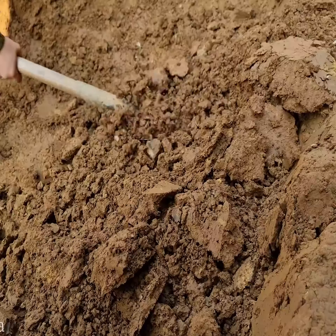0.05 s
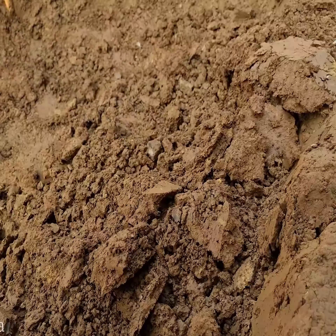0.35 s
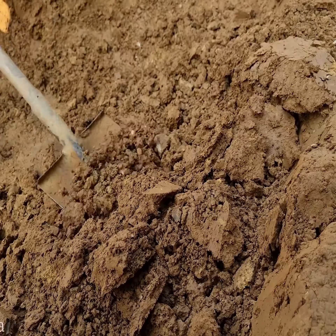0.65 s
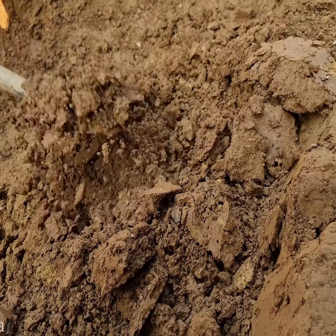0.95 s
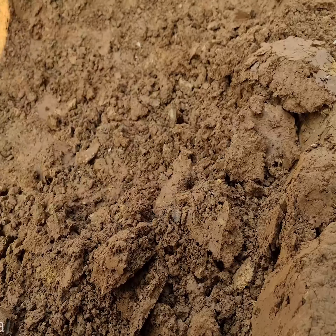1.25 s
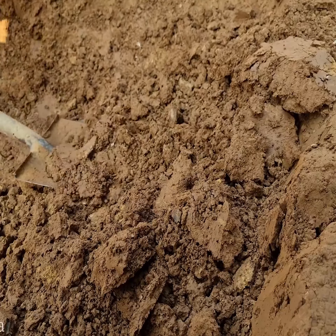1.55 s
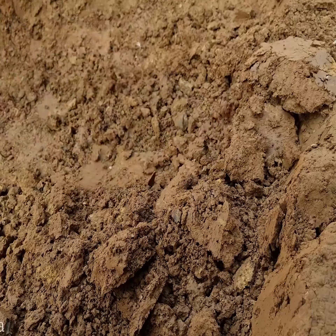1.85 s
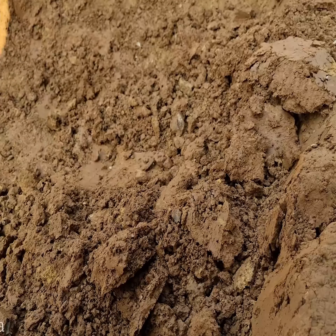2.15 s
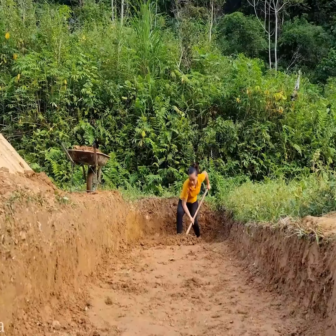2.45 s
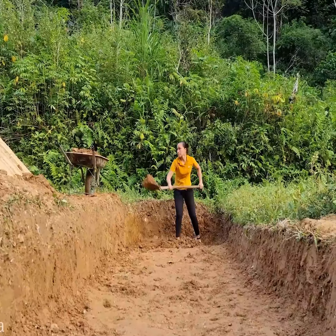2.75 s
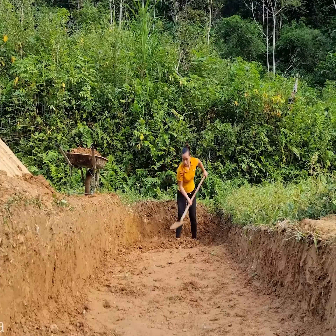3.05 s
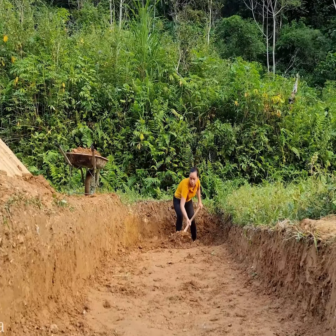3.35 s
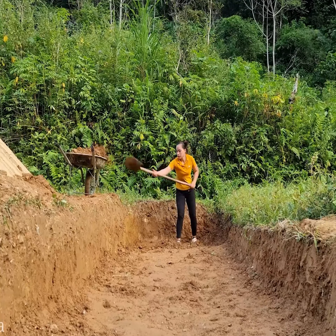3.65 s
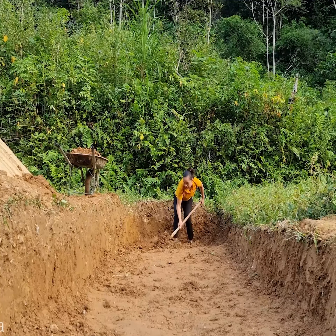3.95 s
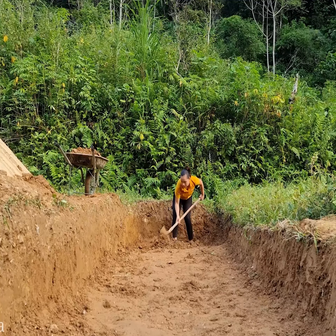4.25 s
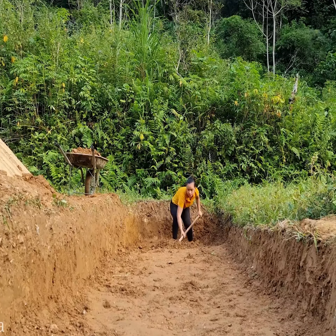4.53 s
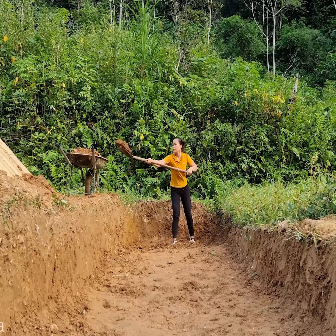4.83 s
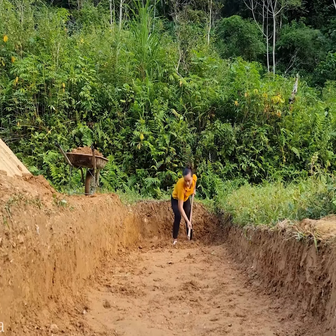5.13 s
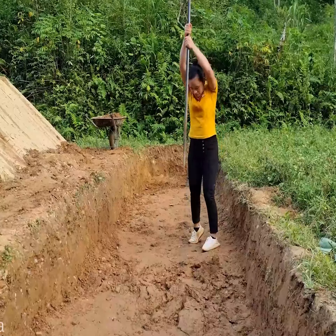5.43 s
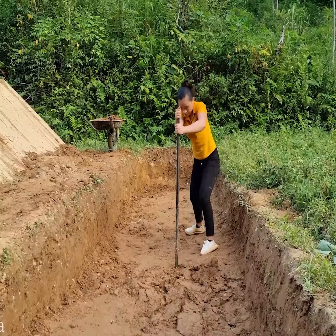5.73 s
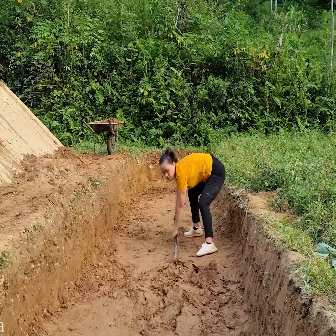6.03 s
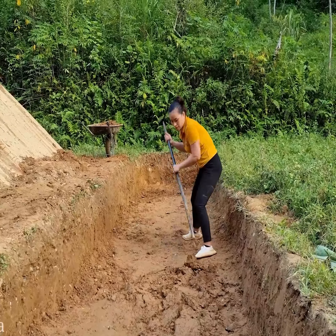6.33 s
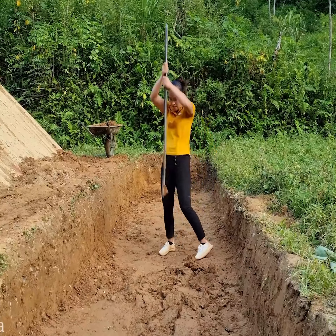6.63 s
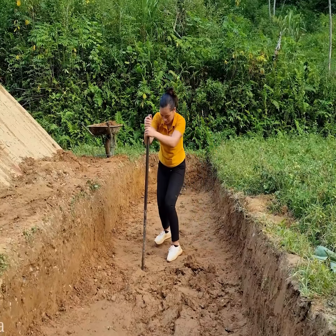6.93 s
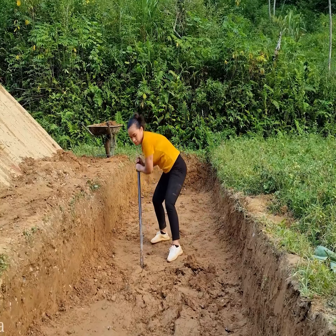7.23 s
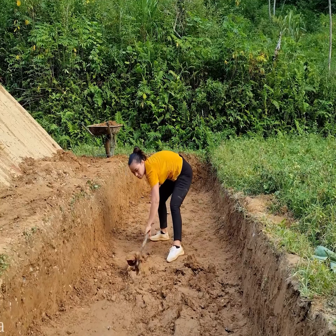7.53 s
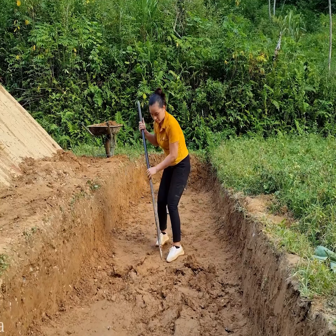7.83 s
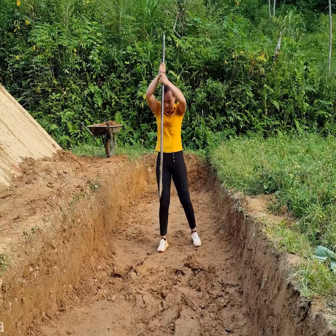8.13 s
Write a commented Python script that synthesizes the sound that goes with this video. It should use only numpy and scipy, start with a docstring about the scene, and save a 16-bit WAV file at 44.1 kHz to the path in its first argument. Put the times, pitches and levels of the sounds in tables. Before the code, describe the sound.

Irregular crunching strikes in dry soil outdoors, close at first over a faint hum, then softer scoops and dull blows of a bar.

```python
"""Outdoors, on dry clay. Close by, a hoe chops and drags through clods while a distant engine gathers speed
and an insect sings. Then a shovel scoops farther off, its blade ringing faintly, and last an iron bar is
rammed into the ground, with a stream murmuring behind and thin chirps from the bushes. Breaking soil is a
swarm of tiny impulses that excite each tool's modes; blows on stone and earth are damped oscillations."""
import sys
import numpy as np
from scipy import signal
from scipy.fft import rfft, irfft, next_fast_len
from scipy.io import wavfile
from scipy.ndimage import uniform_filter1d

SR = 44100
rng = np.random.default_rng(int(sys.argv[2]) if len(sys.argv) > 2 else 0)


def to_wav(s):
    """Save 16-bit WAV."""
    ch = np.atleast_2d(s).T  # columns
    pcm = np.round(np.clip(ch, -1, 1) * 32767)  # PCM
    wavfile.write(sys.argv[1], SR, pcm.astype(np.int16))


N = 360738
TIME = np.arange(N) / SR


def from_db(db):
    """Amplitude ratio of a level: tenfold for every 20 dB."""
    return 10 ** (np.asarray(db) / 20)


def rms_one(x):
    """Normalisation to unit mean power."""
    return x / np.sqrt(np.mean(x ** 2) + 1e-20)


def band(x, low_hz, high_hz, order=2):
    """Causal Butterworth band-pass filtering."""
    edges = [low_hz, min(high_hz, SR / 2 - 500)]
    return signal.sosfilt(signal.butter(order, edges, "band", fs=SR, output="sos"), x + 1e-18)


def resonate(x, hz, width_hz):
    """Forced response of a damped oscillator, with unit gain at resonance."""
    r = np.exp(-np.pi * width_hz / SR)
    feedback = [1, -2 * r * np.cos(2 * np.pi * hz / SR), r * r]
    return signal.lfilter(np.array([1, 0, -1]) * (1 - r * r) / 2, feedback, x + 1e-18)


def drift(per_s):
    """Random modulation of unit rms, interpolated between independent values."""
    points = rng.standard_normal(4000)
    return rms_one(np.interp(TIME * per_s, np.arange(len(points)), points))


def colour(x, points):
    """Spectral shaping by a curve of (frequency [Hz], gain [dB])."""
    size = next_fast_len(N)
    hz, db = np.transpose(points)
    gain_db = np.interp(np.log(np.fft.rfftfreq(size, 1 / SR) + 1), np.log(hz), db)
    return irfft(rfft(x, size) * from_db(gain_db), size)[..., :N]


def air(spectrum):
    """Diffuse outdoor noise: the channels are most coherent in the low hundreds of hertz, wide above."""
    # stereo width: (frequency [Hz], side over mid [dB])
    side_gain = [(60, 0), (200, -9), (400, -8.5), (700, -7), (1290, -0.5), (2400, 5.5), (4400, 4),
                 (8000, -0.5), (15000, 3)]
    mid, side = rng.standard_normal((2, N))
    return rms_one(colour(mid + colour(side, side_gain) * [[1], [-1]], spectrum))


def engine(db=-57, fade_db_per_s=2, waver_db=1.5, firing_db=2.5):
    """A receding engine's orders rise with shaft speed and waver; uneven firing modulates their sum."""
    # acceleration: (time [s], shaft speed [turns/s])
    speed = [(0, 85), (0.45, 87.6), (1.0, 95), (1.6, 101), (2.1, 106), (2.4, 108)]
    # partials: (multiple of shaft speed, relative level [dB])
    orders = [(1.001, -11), (2.001, -3), (3.002, -13.5), (3.5, -8.5), (4, -6), (4.2, -6.5), (4.5, -2.5),
              (5, -3), (6, -12.5)]
    angle = 2 * np.pi * np.cumsum(np.interp(TIME, *np.transpose(speed))) / SR
    hum = np.zeros(N)
    for multiple, level in orders:
        strength = from_db(level + waver_db * drift(11))
        hum += strength * np.sin(multiple * angle + rng.uniform(0, 2 * np.pi) + .5 * drift(14))
    return from_db(db - fade_db_per_s * TIME + firing_db * drift(60)) * band(hum, 110, 3000, order=6)


def insect():
    """A shrill note and two overtones share a slight random frequency modulation."""
    # partials: (frequency [Hz], rms level [dB])
    partials = [(4694, -79), (9388, -86), (14080, -81)]
    flutter = 1 + .003 * drift(150)
    phase_per_hz = 2 * np.pi * np.cumsum(flutter) / SR
    return sum(from_db(db) * np.sqrt(2) * np.sin(hz * phase_per_hz) for hz, db in partials)


def crumbs(per_s=9.0, db=-64.5, settle_s=.003):
    """Stray crumbs roll off the heap as a Poisson process, each a decaying burst of noise."""
    falls = rng.uniform(1, 2, N) * (rng.random(N) < per_s / SR)
    tumble = signal.lfilter([1], [1, -np.exp(-1 / (settle_s * SR))], falls + 1e-18)
    return from_db(db) * tumble * rms_one(band(rng.standard_normal(N), 2500, 11000))


def blows(table, ring_cycles, rough):
    """Damped oscillations rise in half a cycle, fall 60 dB in ring_cycles; crushed grains add noise."""
    out, t = np.zeros(N), TIME[:SR // 8]
    for s, db, hz in table:
        crush = rms_one(band(rng.standard_normal(len(t)), hz / 2, hz * 2))
        envelope = np.minimum(2 * t * hz, 1) * from_db(db - 60 * t * hz / ring_cycles)
        blow = envelope * (np.sin(2 * np.pi * hz * t) + rough * crush)
        start = int(s * SR)
        out[start:start + len(t)] += blow[:N - start]
    return out


def earth():
    """Damping sets the timbre: packed earth thuds for a few cycles, hollow plops ring longer."""
    # dull blows and faint plops: (time [s], relative level [dB], pitch [Hz])
    thuds = [(0.061, -35.5, 340), (0.703, -39, 260), (1.5, -46, 217), (2.151, -41, 260), (2.36, -34.5, 300),
             (5.494, -44.5, 750), (5.612, -36.5, 320), (5.6265, -30, 270), (6.53, -58, 280),
             (6.9128, -30.5, 242), (7.953, -51.5, 239)]
    plops = [(3.78, -53.5, 570), (4.94, -57.5, 423), (6.155, -58, 468), (6.262, -53, 543),
             (7.1, -57.5, 500)]
    dull = blows(thuds, ring_cycles=6.1, rough=0.35) + blows(plops, ring_cycles=34, rough=0.18)
    return from_db(2.5) * band(dull, 175, 3000, order=3)


def stones():
    """Hard impact: the blade meets a stone or a hard clod with a brief, high ring."""
    # knocks: (time [s], relative level [dB], pitch [Hz])
    knocks = [(0.0612, -27, 1140), (0.1278, -11, 2860), (0.7195, -1, 2000), (0.7217, -4, 1576),
              (1.7135, -6, 3280), (1.748, -26, 1240), (2.2995, -30.5, 1160), (2.3653, -8, 3150),
              (2.588, -31, 2230), (5.1031, -19.5, 1990), (5.1045, -24.5, 1270), (5.2095, -26.5, 1300)]
    return from_db(-2) * band(blows(knocks, ring_cycles=16, rough=0.64), 490, 12000)


def grit(per_s, spread_db, dust):
    """Shot noise: grains of uneven size snap at random over a hiss of fine dust."""
    sizes = from_db(spread_db * np.minimum(rng.exponential(1, N), 3)) * rng.choice([-1, 1], N)
    return rms_one(sizes * (rng.random(N) < per_s / SR)) + dust * rng.standard_normal(N)


def steady(x, window_s):
    """Division by the running rms evens out the strength but keeps the single grains."""
    return x / np.sqrt(np.abs(uniform_filter1d(x ** 2, int(window_s * SR))) + 1e-9)


def burst(t, rise_s, hold_s, fall_s):
    """Transient envelope: a linear rise, then exponential decay from hold_s on."""
    return np.minimum(t / rise_s, 1) * np.exp(-np.maximum(t - hold_s, 0) / fall_s)


def add(power, s, envelope, db, bass_db, treble_db):
    """Incoherent sounds add in power: one burst joins the bass, body and treble at time s."""
    start = int(s * SR)
    gains = from_db([[db + bass_db], [db], [db + treble_db]])
    power[:, start:start + len(envelope)] += ((gains * envelope) ** 2)[:, :N - start]


def breaking(entry_s=0.006, slide_db=-11, jam_build_s=0.004, trickle_db=-27.5):
    """Envelopes of fracturing soil in three bands: chops enter, slide and jam; clods and scuffs burst."""
    # a tool cuts in: (time [s], entry level [dB], travel [s], jam level [dB], settling [s],
    # bass offset [dB], treble offset [dB])
    chops = [(0.094, -42, 0.037, -29.5, 0.012, -17, 1), (0.6995, -16.5, 0.023, -18.5, 0.0039, -8.5, 0.5),
             (1.4969, -35.5, 0.017, -34, 0.0023, 2, 4.5), (1.712, -23.5, 0.035, -34, 0.0024, -21.5, 2),
             (2.3429, -23.5, 0.022, -19, 0.004, -10, -0.5), (2.482, -37.5, 0.012, -46, 0.045, -4, -4),
             (3.2297, -32.5, 0.012, -32, 0.011, -14.5, -1), (3.9281, -36, 0.012, -35, 0.019, -20, -1.5),
             (4.224, -42.5, 0.02, -34, 0.012, -11.5, -4.5), (4.5447, -31.5, 0.022, -30.5, 0.0093, -10, -3),
             (5.207, -35.5, 0.021, -46, 0.007, 0, -4.5), (5.6087, -36, 0.0055, -50, 0.0032, 0.5, -3.5),
             (6.892, -50, 0.016, -60.5, 0.0039, 2, 3.5)]
    # a clod drops and bursts: (time [s], level [dB], bass offset [dB], treble offset [dB])
    clods = [(0.557, -44, 11.5, -1), (0.9677, -39, -8, -3.5), (1.391, -50.5, -5, 8.5),
             (1.49, -48.5, -15, 10), (2.08, -58, 4, 7.5), (2.149, -54.5, -2, 5), (2.586, -46.5, -1, -1.5),
             (2.615, -50, -3, -11.5), (2.819, -56, -23, 2), (3.07, -57, -0.5, 4), (3.3369, -38.5, -35, -3),
             (3.709, -54.5, -8, 1.5), (3.766, -59, 8.5, 11), (4.604, -51, -25, -6)]
    # light scuffs on loose ground: (time [s], level [dB])
    scuffs = [(2.959, -65.5), (3.348, -66.5), (3.674, -71), (4.095, -65), (5.914, -62), (7.214, -68.5)]
    power, t = np.zeros((3, N)), TIME[:SR // 5]
    for s, entry_db, travel_s, jam_db, settle_s, bass_db, treble_db in chops:
        entry = burst(t, rise_s=0.0032, hold_s=entry_s, fall_s=0.0045)
        add(power, s, entry, entry_db, bass_db, treble_db + 1.5)   # dry crust sounds bright
        # the quiet slide builds to the jam just before the blade stops
        packing = from_db(slide_db * (1 - np.exp(np.minimum(t - travel_s, 0) / jam_build_s)))
        jam = packing * burst(t, entry_s, travel_s, settle_s)
        trickle = from_db(trickle_db) * burst(t, travel_s, travel_s, fall_s=0.0084)   # crumbs run on
        add(power, s, jam + trickle, jam_db, bass_db, treble_db - 4)   # packed clay sounds dull
    for s, db, bass_db, treble_db in clods:
        add(power, s, burst(t, rise_s=0.0029, hold_s=0.00524, fall_s=0.0032), db, bass_db, treble_db)
    for s, db in scuffs:
        add(power, s, burst(t, rise_s=0.003, hold_s=0.026, fall_s=0.015), db, bass_db=-2, treble_db=9)
    return np.sqrt(power)


def bites(clump_db=3.5, clumps_per_s=300):
    """Brittle fracture gives dense bursts of impulses: coarse lumps sound low, sand high."""
    lumps = band(grit(per_s=1200, spread_db=7.0, dust=.14), 370, 1600)
    grains = band(grit(per_s=2700, spread_db=0.5, dust=.3), 1200, 4530, order=3)
    sand = band(grit(per_s=5300, spread_db=4.5, dust=.3), 4700, 14000, order=3)
    bass = from_db(-2.5) * steady(lumps, 0.021)
    body = from_db(-4) * steady(grains, 0.021)
    treble = from_db(1.9) * steady(band(sand, 4200, 12000, order=1), 0.012)
    treble = band(treble, 2000, 12000, order=1)
    cracks = steady(from_db(clump_db * drift(clumps_per_s)), 0.036)   # soil gives way unevenly
    return np.sum(breaking() * [bass, body, treble], axis=0) * cracks


def steel(x, modes, direct_db, ring_db):
    """Modal superposition: the excitation is heard directly and through the tool's resonances."""
    ring = sum(from_db(db) * resonate(x, hz, width) for hz, width, db in modes)
    return from_db(direct_db) * x + from_db(ring_db) * ring


def hoe(crunch, hits):
    """Forced vibration: the crunch drives the hoe's blade, while the hits are heard directly."""
    # blade modes: (frequency [Hz], bandwidth [Hz], relative gain [dB])
    hoe_modes = [(1384, 70, -5), (2000, 140, 0.5), (2250, 120, 4), (3350, 200, 10), (4400, 270, 7.5),
                 (5432, 37, 0.5), (5940, 110, -4.5), (8060, 100, -3), (8950, 80, -8)]
    return steel(crunch, hoe_modes, direct_db=-2.5, ring_db=-11) + hits


def drags(treble_db=1.0, clump_db=1.5):
    """Granular friction: loose crumbs rasp along the pulled blade in uneven clumps."""
    # one curve for each pull: (time [s], level [dB], treble offset [dB])
    strokes = [
        [(0.74, -48, -2.5), (0.774, -52, -6), (0.784, -47, -3.5), (0.844, -56.5, 4), (0.888, -41.5, -3),
         (0.928, -46.5, -6), (0.945, -65, -8)],
        [(1.52, -56, 5.5), (1.578, -65, 7), (1.64, -46.5, 5), (1.686, -51.5, 7.5), (1.706, -35.5, 0),
         (1.711, -33, 15)],
        [(2.382, -48, -0.5), (2.445, -67.5, 0)],
        [(3.268, -47, 8), (3.282, -47, -4), (3.298, -52.5, 11.5), (3.31, -54, -3.5), (3.335, -72, 17)],
    ]
    body = rms_one(band(grit(per_s=2000, spread_db=5.5, dust=1.0), 1300, 3800, order=3))
    treble = rms_one(band(grit(per_s=4000, spread_db=2.0, dust=.4), 3640, 10950))
    out = np.zeros(N)
    for stroke in strokes:
        s, db, bright_db = np.transpose(stroke)
        pull = from_db(np.interp(TIME, s, db, left=-200, right=-200))
        brightness = from_db(treble_db + np.interp(TIME, s, bright_db))
        out += pull * (body + brightness * treble)
    return out * from_db(clump_db * drift(130))


def shovel(crunch, hits):
    """Crunch and hits both excite the shovel's resonances; distance dulls the top."""
    # blade modes: (frequency [Hz], bandwidth [Hz], relative gain [dB])
    shovel_modes = [(922, 64, 8.3), (1656, 20, 3.2), (1750, 420, 2.1), (1828, 36, 2.7), (2220, 220, 1.1),
                    (2830, 100, 0.66), (3908, 99, 11.5), (4200, 270, 4.6), (5480, 170, 7.8),
                    (5850, 69, 2.2), (7340, 390, 1.2)]
    scoops = steel(crunch, shovel_modes, direct_db=-5, ring_db=-2.8)
    clanks = steel(hits, shovel_modes, direct_db=-3, ring_db=-8)
    return band(scoops + clanks, 150, 11700, order=1)


def stream(bubbles_per_s=260, sizes=14):
    """Bubble resonance: small bubbles ring briefly at random over the broad rush of the water."""
    # rushing water: (frequency [Hz], relative spectral density [dB])
    water = [(30, -29), (110, -30), (180, -15), (270, -15), (420, -9.5), (700, -10.5), (950, -2),
             (1280, -12), (1600, -7.5), (2750, -13.5), (3400, -13), (10500, -22.5), (16000, -27.5)]
    rush = from_db(-61) * air(water)
    pops = from_db(4 * np.minimum(rng.exponential(1, N), 3)) * (rng.random(N) < bubbles_per_s / SR)
    size_of_pop = rng.integers(0, sizes, N)
    pitches = np.geomspace(700, 1300, sizes)
    babble = sum(resonate(pops * (size_of_pop == k), hz, hz / 7) / hz for k, hz in enumerate(pitches))
    return rush + from_db(-69.5) * rms_one(babble)


def bar(crunch, hits):
    """The crunch rings the iron bar, chiefly in two lightly damped modes; the hits are heard directly."""
    # bar modes: (frequency [Hz], bandwidth [Hz], relative gain [dB])
    bar_modes = [(1900, 1000, 14), (3400, 50, 34), (6100, 180, -18), (7500, 73, 30), (9230, 210, 14)]
    return steel(crunch, bar_modes, direct_db=-4, ring_db=-21) + hits


def chirps():
    """Narrow-band noise has a restless pitch: thin calls from the bushes swell and fade."""
    # calls: (time [s], duration [s], pitch [Hz], resonator bandwidth [Hz], level [dB])
    calls = [(5.632, .14, 9050, 400, -71.5), (5.64, 0.13, 12800, 800, -73), (7.092, 0.17, 3450, 600, -67.5),
             (7.586, 0.17, 9150, 400, -64.5), (7.62, .22, 12300, 1300, -71.5)]
    out = np.zeros((2, N))
    for s, length, hz, width, db in calls:
        noise = rng.standard_normal((2, N))
        whistle = rms_one(resonate(resonate(noise, hz, width), hz, width))
        out += from_db(db) * whistle * np.sin(np.pi * np.clip((TIME - s) / length, 0, 1))
    return out


def trench(x, echo_db, t60_s=0.037):
    """Diffuse reflection: rough earth walls return a short, dull echo, different on each side."""
    t = TIME[:SR // 3]
    envelope = from_db(-60 * t / t60_s) * np.minimum(t / .008, 1)
    scatter = band(rng.standard_normal((2, len(t))), 500, 5000, order=1) * envelope
    scatter /= np.sqrt(np.sum(scatter ** 2) / 2)
    return from_db(echo_db) * signal.fftconvolve(x[None], scatter, axes=1)[:, :N]


def microphones(x, phase, left_db):
    """Directional cues: sound reaches the two microphones with different phase and strength."""
    size = next_fast_len(N)
    lead = np.interp(np.fft.rfftfreq(size, 1 / SR), *np.transpose(phase))
    sides = np.array([[.5], [-.5]])
    return irfft(rfft(x, size) * np.exp(1j * lead * sides), size)[:, :N] * from_db(left_db * sides)


def scene():
    """Superposition: hoe, shovel and bar work in turn, each before its own crossfaded background."""
    # arrival from near and far work: (frequency [Hz], phase lead of left over right [rad])
    near_phase = [(0, 0.5), (3100, 1.0), (4130, 1.5), (5510, 2), (6370, 7), (7840, 10.5), (13200, 10.5),
                  (16300, 12.5)]
    far_phase = [(0, 0), (2760, 1.7), (3300, -0.9), (4310, 1.8), (4820, -1.8), (5600, -1.2), (6370, 2),
                 (8500, 1.74), (9400, -1.7), (16000, 0.3)]
    # outdoor hush behind hoe and shovel: (frequency [Hz], relative spectral density [dB])
    hoe_air = [(30, -40.5), (90, -28.5), (134, -21.5), (180, -8.5), (280, -14), (400, -12.5), (900, -13.5),
               (1400, -21.5), (2010, -25.5), (4400, -31), (7000, -35), (11000, -35.5), (14000, -45.5),
               (16000, -54)]
    shovel_air = [(18, -59), (30, -13), (121, -24.5), (189, -4.5), (266, -8), (486, -5), (684, -10),
                  (913, -1), (1960, -6), (2900, -8), (3310, -10), (7870, -16.5), (16000, -25)]
    hoe_end_s, shovel_end_s = 2.43, 5.3
    hoe_on, bar_on = 1.0 * (TIME < hoe_end_s), 1.0 * (TIME > shovel_end_s)
    shovel_on = 1 - hoe_on - bar_on
    crunch = bites() + drags() + crumbs() * (1 - bar_on)
    hits = stones() + earth()
    near = hoe(crunch * hoe_on, hits * hoe_on)
    far = shovel(crunch * shovel_on, hits * shovel_on) + bar(crunch * bar_on, hits * bar_on)
    digging = microphones(near, near_phase, left_db=2.5) + trench(near, echo_db=-17.5)
    digging += microphones(far, far_phase, left_db=-0.5) + trench(far, echo_db=-17)
    fade_out, fade_in = np.clip((2.47 - TIME) / .07, 0, 1), np.clip((TIME - 5.2) / .05, 0, 1)
    behind = fade_out * (from_db(-58) * air(hoe_air) + insect() + engine())
    behind += np.sqrt(fade_in) * stream()
    behind += np.sqrt(1 - fade_out - fade_in) * from_db(-62) * air(shovel_air)
    return digging + behind + chirps()


def record(dry):
    """Band limiting: an elliptic low-pass cuts steeply above 16.2 kHz."""
    return signal.sosfilt(signal.ellip(10, .1, 80, 16200, fs=SR, output="sos"), dry)


dry = scene()
out = record(dry)
to_wav(out)
```